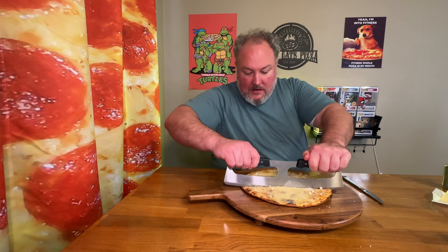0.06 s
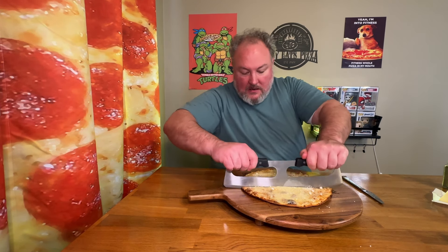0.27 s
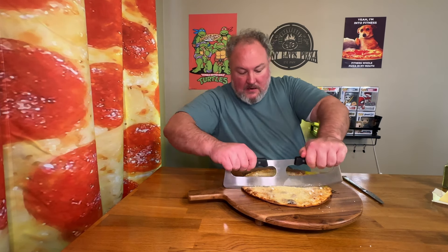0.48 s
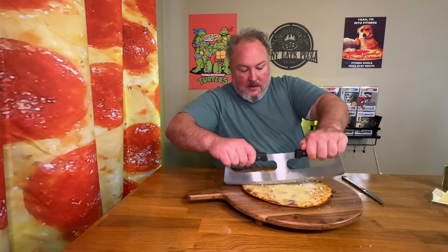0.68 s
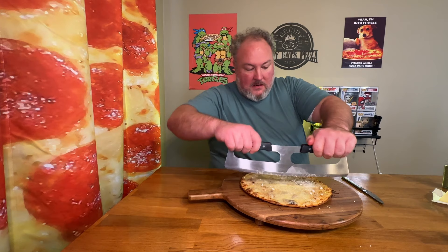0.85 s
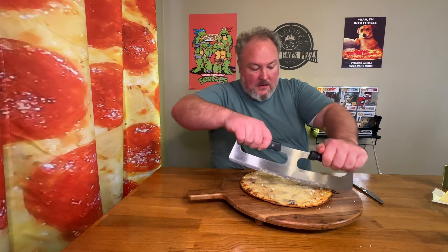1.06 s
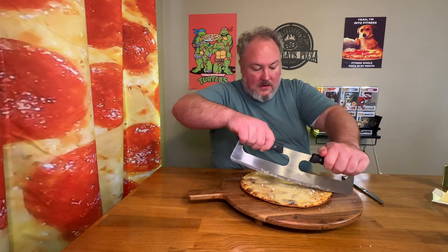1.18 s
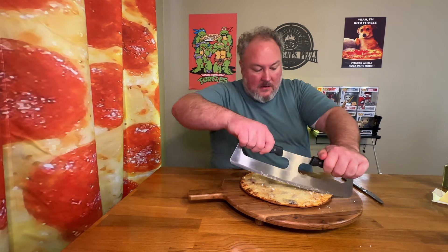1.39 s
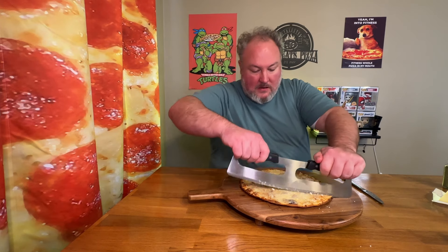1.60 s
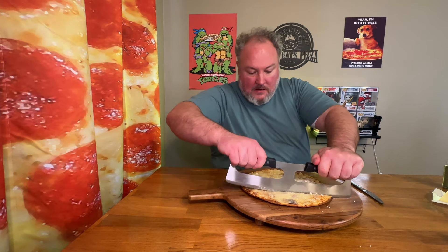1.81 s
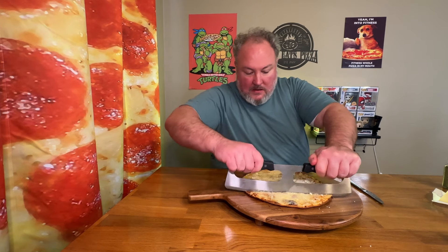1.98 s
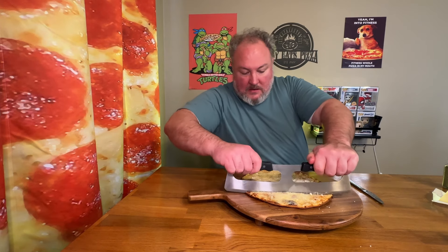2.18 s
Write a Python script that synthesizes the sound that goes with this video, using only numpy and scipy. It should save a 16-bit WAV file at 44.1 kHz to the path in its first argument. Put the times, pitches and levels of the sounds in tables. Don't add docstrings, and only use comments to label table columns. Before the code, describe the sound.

A rocker blade cuts crisp crust: brief crackle and a loud woody knock, a near-quiet lull, light crackles as the blade is set down, then a denser crunchy cut with smaller knocks, close in a small quiet room.

```python
import sys
import numpy as np
from scipy import signal
from scipy.fft import rfft, irfft, next_fast_len
from scipy.io import wavfile
from scipy.ndimage import uniform_filter1d, map_coordinates

SR = 44100
rng = np.random.default_rng(int(sys.argv[2]) if len(sys.argv) > 2 else 0)


def gain_from_decibels(decibels):
    exponent = np.asarray(decibels, float) / 20
    return 10 ** exponent


def unload_audio(sound):
    columns = np.transpose(np.atleast_2d(sound))
    steps = np.round(np.clip(columns, -1, 1) * 32767)
    wavfile.write(sys.argv[1], SR, steps.astype(np.int16))


N = 99225
SNAP_T60 = 0.0035


def unit(x):
    return x / np.sqrt(np.mean(x ** 2) + 1e-20)


def along(points, hz):
    f, v = np.transpose(points)
    return np.interp(np.log(hz + 1), np.log(f + 1), v)


def filtered(x, response):
    m = next_fast_len(x.shape[-1] + SR // 4)
    spectrum = rfft(x, m) * response(np.fft.rfftfreq(m, 1 / SR))
    return irfft(spectrum, m)[..., :x.shape[-1]]


def add(track, s, sound):
    part = track[round(s * SR):][:len(sound)]
    part += sound[:len(part)]


def resonances(modes):
    def response(f):
        total = 0
        for k, (centre, width, db) in enumerate(modes):
            resonator = 1j * f * width / (centre * centre - f * f + 1j * f * width)
            total = total + (-1) ** k * gain_from_decibels(db) * resonator
        return total
    return response


def hush():
    # (frequency [Hz], density [dB per Hz])
    hush_spectrum = [(25, 0), (70, -3), (150, -14), (700, -21), (2800, -28), (5600, -35), (15500, -39),
                     (16200, -60)]
    whine_hz, whine_width_hz = 1400, 60
    air = unit(filtered(rng.standard_normal(N), lambda hz: gain_from_decibels(along(hush_spectrum, hz))))
    whine = unit(filtered(rng.standard_normal(N), lambda hz: np.exp(-((hz - whine_hz) / whine_width_hz) ** 2)))
    return gain_from_decibels(-67.5) * air + gain_from_decibels(-88) * whine


def rumble():
    # (time [s], level [dB])
    pressure = [(0, -53.5), (.21, -53), (.31, -42), (.59, -59.5), (.71, -54), (0.909, -60.5), (1.28, -82),
                (1.33, -52.5), (1.61, -56.5), (1.77, -55.5), (1.816, -36), (1.854, -56), (1.925, -40),
                (2.11, -46), (2.25, -48.5)]
    # (frequency [Hz], density [dB per Hz])
    shudder_spectrum = [(18, -2.5), (30, 1.5), (80, -2.5), (130, -19.5), (200, -17.5), (300, -32),
                        (500, -79.5)]
    pressure_db = np.interp(np.arange(N) / SR, *np.transpose(pressure))
    shudder = unit(filtered(rng.standard_normal(N), lambda hz: gain_from_decibels(along(shudder_spectrum, hz))))
    return gain_from_decibels(pressure_db) * shudder


def table():
    sway_times = [0, .219, .249, .262, .655, 1.309, 1.33, 1.598, 1.719, 1.79, 1.795, 1.932, 2.048, 2.2]
    # (frequency [Hz], level [dB], rise [s], t60 [s])
    sways = [(53.3, -43.5, 0.071, 0.41), (30.4, -29, .019, 0.29), (79.17, -27.5, 0.026, 0.62),
             (215.8, -33, 0.057, 0.263), (80.6, -37, 0.045, .51), (28.9, -41, 0.016, 0.38),
             (58, -28.5, 0.043, 0.4), (86.3, -36.5, 0.081, .31), (82, -32.5, 0.012, 0.11),
             (188.3, -27, 0.0156, 0.099), (36.6, -38, .021, .11), (83, -30.5, 0.019, 0.43),
             (85.4, -40.5, 0.011, 0.2), (63.8, -45, 0.027, 0.5)]
    flutter_db, flutter_per_s = 2.5, 22
    out, t = np.zeros(N), np.arange(SR) / SR
    for s, (hz, db, rise, t60) in zip(sway_times, sways):
        swell = (1 - np.exp(-t / rise)) ** 2
        add(out, s, gain_from_decibels(db - 60 * t / t60) * swell * 2 * np.sin(2 * np.pi * hz * t))
    knots = rng.standard_normal(int(N * flutter_per_s / SR) + 4)
    flutter = map_coordinates(knots, [np.arange(N) * flutter_per_s / SR])
    return out * gain_from_decibels(flutter_db * flutter)


def crackle():
    # (start [s], end [s], level at start [dB], level at end [dB], board contact [dB])
    crushes = [(0.002, 0.086, -50.5, -57, -1.5), (0.081, 0.168, -58, -48.5, -3.5),
               (0.175, 0.207, -41.5, -41.5, -2), (0.207, 0.219, -58.5, -27, 10),
               (0.366, 0.415, -58, -51, 1), (0.551, 0.609, -65, -61, -4), (0.612, 0.662, -64.5, -55, 1),
               (1.19, 1.449, -72, -74, -3.5), (1.458, 1.482, -62, -55, -4),
               (1.491, 1.605, -55.5, -47.5, -2), (1.613, 1.667, -45, -50.5, 1.5),
               (1.669, 1.728, -49.5, -54, 2.5), (1.728, 1.774, -67, -48.5, 2.5),
               (1.786, 1.828, -40.5, -43, 2.5), (1.844, 1.871, -39, -58.5, 2.5),
               (1.873, 1.933, -39, -39.5, 0), (1.94, 2.007, -57.5, -48.5, 1), (2.015, 2.06, -45, -40.5, 2),
               (2.072, 2.129, -52, -59, -2.5), (2.134, 2.177, -33, -52, -1)]
    breaks_per_s, size_db = 2200, 2
    count, time = int(breaks_per_s * N / SR), np.arange(N) / SR
    sizes = gain_from_decibels(size_db * np.minimum(rng.exponential(size=count), 4))
    sparks = np.bincount(rng.integers(0, N, count), sizes, N)
    fading = signal.fftconvolve(sparks, gain_from_decibels(-60 * np.arange(512) / SR / SNAP_T60))[:N]
    breaks = gain_from_decibels(-9.5) * unit(fading * rng.standard_normal(N))
    efforts = np.array([gain_from_decibels(np.interp(time, (start, end), (from_db, to_db), left=-120, right=-120))
                        for start, end, from_db, to_db, _ in crushes])
    contact = gain_from_decibels(np.array(crushes)[:, -1])
    in_air = uniform_filter1d(efforts.sum(axis=0), size=100) * breaks
    pressed = uniform_filter1d(contact @ efforts, size=100) * breaks
    return in_air, pressed


def bursts(tilts_db):
    tail_t60, tail_db, tint_db = 0.025, -15, 2.5
    t, hz = np.arange(1024) / SR, np.fft.rfftfreq(1024, 1 / SR)
    noise = rng.standard_normal((len(tilts_db), 1024)) + 2 * signal.unit_impulse(1024, 2)
    tint = unit(uniform_filter1d(rng.standard_normal((len(tilts_db), 513)), size=60, axis=1))
    octaves = np.log2(np.maximum(hz, 1000) / 5000)
    colour_db = tint_db * tint + np.outer(np.clip(tilts_db, -5, 5), octaves)
    decay = gain_from_decibels(-60 * t / SNAP_T60) + gain_from_decibels(tail_db - 60 * t / tail_t60)
    noise = irfft(rfft(noise) * gain_from_decibels(colour_db)) * decay
    return noise / np.abs(noise).max(axis=1, keepdims=True)


def crust():
    # (time [s], peak [dB], tilt [dB per octave], low ring [dB], high ring [dB])
    first_cut = [(0.0196, -37.5, 1, -57, -43), (0.0325, -31, 0.5, -57.5, -53),
                 (0.052, -36.5, 1.5, -55.5, -69), (0.1056, -39, 1, -59.5, -46.5),
                 (0.1174, -41.5, 1.5, -55.5, -51), (0.1384, -37.5, 0, -46.5, -41),
                 (0.166, -16.5, 4, -29, -20.5), (0.1804, -30.5, 0, -33, -45.5),
                 (0.2005, -31.5, 1.5, -38, -28.5), (0.212, -30.5, -10.5, -26, -62),
                 (0.2179, -27.5, -4.5, -10.5, -18), (0.3386, -37.5, 4, -42, -50.5),
                 (0.39, -45, -0.5, -54.5, -65), (0.401, -41, 2.5, -46.5, -65), (0.4118, -49, 2.5, -46, -39),
                 (0.4677, -53.5, -1, -53, -75), (0.618, -52.5, 6, -57, -47), (0.634, -28, -4, -44.5, -38),
                 (0.6594, -56, 11, -45.5, -51)]
    set_down = [(1.2211, -52, -8, -75, -60), (1.2496, -49, -3.5, -71, -65), (1.291, -64, 1.5, -63, -59),
                (1.291, -39, -4, -47, -56), (1.3404, -47.5, -2, -52, -68), (1.3628, -45, 0, -78, -63),
                (1.3932, -40.5, -3.5, -70, -53.5), (1.4744, -43, 0, -65, -47.5),
                (1.484, -33.5, 0, -63, -48), (1.503, -43, -4.5, -68, -43), (1.515, -30, 4, -76, -53),
                (1.5224, -41, 1.5, -73, -52), (1.5424, -40, -1, -59, -38.5), (1.5713, -35, 0, -44, -33),
                (1.5908, -35, 1.5, -48, -30), (1.6134, -43, -0.5, -45, -33), (1.6192, -40, -9, -37.5, -26),
                (1.6284, -44.5, -1, -41, -31), (1.6407, -36.5, -2, -44, -43), (1.6524, -46.5, 1, -65, -43),
                (1.6764, -47, -2, -54, -41), (1.6914, -43, 5, -43, -38), (1.698, -37.5, 1.5, -40, -34),
                (1.7154, -40.5, -1, -68, -55)]
    second_cut = [(1.7666, -39.5, 6, -56, -57), (1.7802, -45, 1.5, -64, -47),
                  (1.7804, -29.5, 6.5, -35, -42), (1.8457, -38.5, -7, -65, -44),
                  (1.8597, -41.5, 5, -43, -48), (1.8773, -38, 0, -34, -33),
                  (1.8895, -27.5, -2.5, -16, -29.5), (1.9268, -34, -3, -25, -47),
                  (1.943, -33.5, 0.5, -36, -49), (1.9875, -24, 1.5, -64, -29.5),
                  (2.0048, -33, -2, -59, -34.5), (2.0135, -35.5, -3.5, -43, -43),
                  (2.0378, -34, -3, -41.5, -40), (2.0676, -34, 8, -49, -54), (2.0764, -31.5, 0, -59, -38.5),
                  (2.0851, -27.5, 0.5, -42.5, -39), (2.1087, -36.5, 2.5, -46, -43),
                  (2.116, -37.5, 2, -50, -45), (2.13, -23.5, -2, -32, -21.5),
                  (2.1514, -28.5, -5.5, -32, -46), (2.1636, -37.5, -1.5, -43, -42),
                  (2.1704, -36.5, -0.5, -36, -66)]
    # (frequency [Hz], density [dB per Hz])
    crust_spectrum = [(700, -34.5), (1300, -12), (2200, -7.5), (4500, -6.5), (6300, -7.5), (8100, -8),
                      (10000, -14), (15600, -14)]
    # (frequency [Hz], width [Hz], level [dB])
    loaded_modes = [(210, 60, -8), (584.5, 37, -1), (921, 47, 1)]
    # (frequency [Hz], width [Hz], level [dB])
    blade_modes = [(1407, 130, -1.5), (1848, 83, -2), (2381, 150, -3.5), (3078, 220, -6),
                   (3264, 130, -10.5), (3700, 80, -9), (4404, 110, -15), (7940, 230, -11)]
    snap_lag_s, grind_t60, ring_top_db = 0.001, 0.019, -36
    snaps = np.array([*first_cut, *set_down, *second_cut])
    grind = gain_from_decibels(-60 * np.arange(1024) / SR / grind_t60)
    air, low, high = np.zeros((3, N))
    fine, pressed = crackle()
    for (s, db, _, low_db, high_db), burst in zip(snaps, bursts(snaps[:, 2])):
        jolt = signal.unit_impulse(1024) + 0.28 * grind * rng.standard_normal(1024)
        add(air, s + snap_lag_s, gain_from_decibels(db + 3.5) * burst)
        add(low, s + snap_lag_s, gain_from_decibels(min(low_db, ring_top_db) + 32.5) * jolt)
        add(high, s + snap_lag_s, gain_from_decibels(high_db + 24) * jolt)
    radiated = filtered(air + fine, lambda hz: gain_from_decibels(along(crust_spectrum, hz) + 13.5))
    board_ring = filtered(low + gain_from_decibels(25) * pressed, resonances(loaded_modes))
    blade_ring = filtered(high + gain_from_decibels(23) * pressed, resonances(blade_modes))
    return radiated + board_ring + blade_ring


def board():
    # (frequency [Hz], level [dB], t60 [s])
    wood_modes = [(116, 3, 0.067), (202.6, -10, 0.11), (284, -3, 0.036), (406.8, -11, 0.13),
                  (484.6, -15.5, 0.1), (509, -9.5, 0.15), (593, 0, 0.074), (662, -4, 0.047),
                  (935.3, -6, 0.041), (1018, -4.5, 0.026), (1440, 0.5, 0.023), (1905, -1.5, 0.019),
                  (2517, 0, 0.011), (2830, 3, 0.012)]
    knock_times = [
        0.167,
        0.2192,
        0.2208,
        0.634,
        1.3035,
        1.848,
        1.8925,
        2.133,
    ]
    # (level [dB], strongest frequency [Hz], spread [octaves], thump [dB])
    knocks = [
        (-20, 2000, 0.32, -39),
        (-17, 2950, 0.24, -61.5),
        (-8.5, 666, 0.85, -21.5),
        (-40, 1140, 1, -40.5),
        (-32.5, 226, 0.51, -40.5),
        (-31.5, 850, 0.33, -44),
        (-19, 600, 0.9, -31.5),
        (-22.5, 960, 0.27, -56),
    ]
    contact_s, thump_s = 0.00058, 0.0029
    out, t = np.zeros(N), np.arange(SR // 2) / SR
    for s, (db, centre_hz, octaves, thump_db) in zip(knock_times, knocks):
        ring = np.zeros(len(t))
        for hz, level, t60 in wood_modes:
            off_pitch_db = 2.28 * (np.log2(hz / centre_hz) / octaves) ** 2
            ring += gain_from_decibels(level - off_pitch_db - 60 * t / t60) * np.sin(2 * np.pi * hz * t)
        add(out, s, gain_from_decibels(db) * ring * (1 - np.exp(-t / contact_s)))
        u = t / thump_s - 4
        thump = (1 - u ** 2) * np.exp(-u ** 2 / 2)
        add(out, s + 0.00061 - 4 * thump_s, gain_from_decibels(thump_db) * thump)
    return out


def room(x):
    # (frequency [Hz], t60 [s])
    reverb_times = [(100, 0.39), (600, 0.54), (3000, 0.46), (12000, 0.32)]
    out, size = np.zeros(N), 4096
    for start in range(0, N, size):
        hz, t, z = signal.stft(rng.standard_normal(SR // 2), SR, nperseg=256)
        decay = gain_from_decibels(-60 * t / along(reverb_times, hz)[:, None])
        tail = signal.istft(z * decay, SR, nperseg=256)[1]
        answer = signal.fftconvolve(x[start:start + size], tail / np.linalg.norm(tail))
        add(out, start / SR + 0.006, answer)
    return out


def scene():
    mirror_s, mirror_gain, room_db = 0.0002544, 0.33, -12.5
    cut, blows = crust(), board()
    mirrored = filtered(cut, lambda hz: 1 + mirror_gain * np.exp(-2j * np.pi * hz * mirror_s))
    reverberant = gain_from_decibels(room_db) * room(cut + blows)
    return (mirrored + blows + reverberant + table() + hush() + rumble())[None]


def top_cut(x):
    return signal.sosfilt(signal.butter(12, 16830, fs=SR, output="sos"), x)


def record(dry):
    mix = filtered(dry, lambda hz: hz < 16000)
    return top_cut(mix)


dry = scene()
out = record(dry)
unload_audio(out)
```